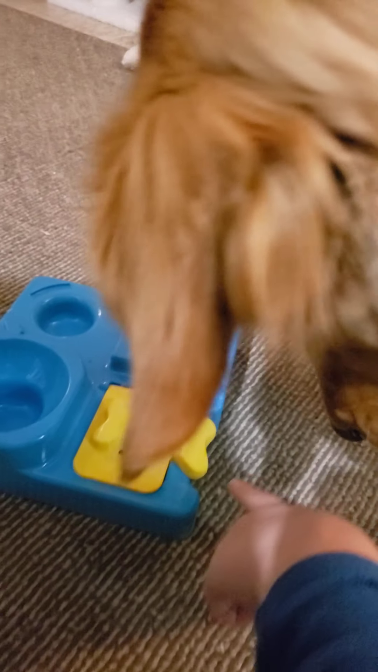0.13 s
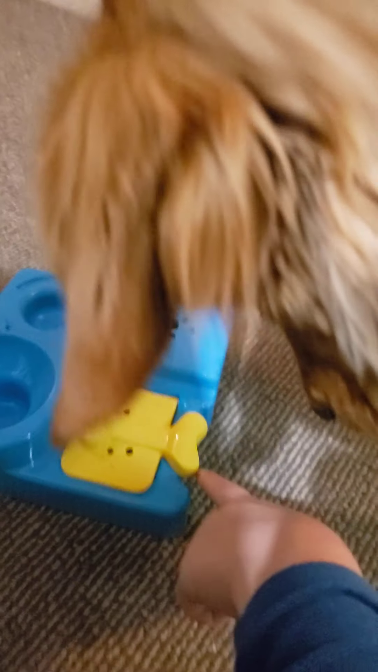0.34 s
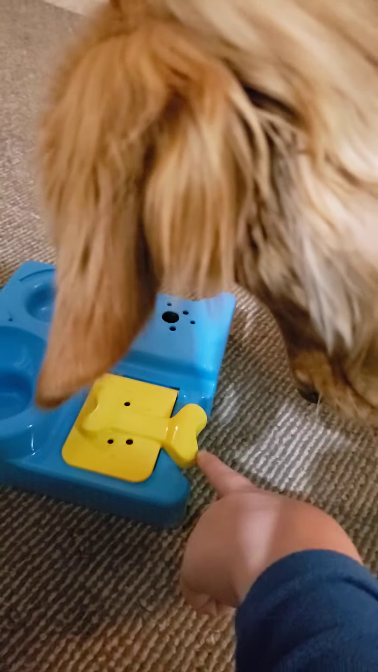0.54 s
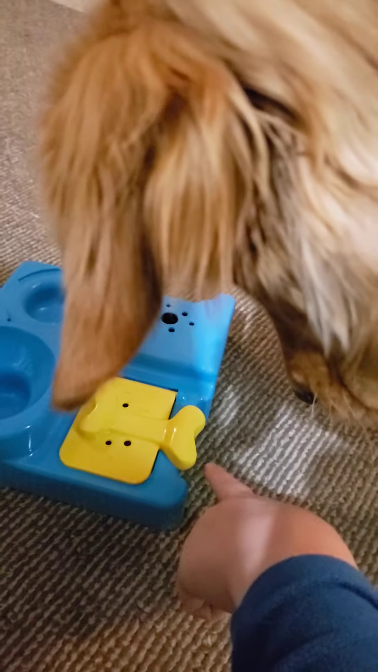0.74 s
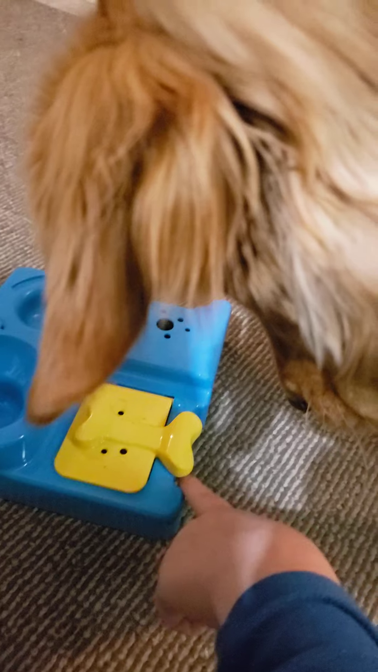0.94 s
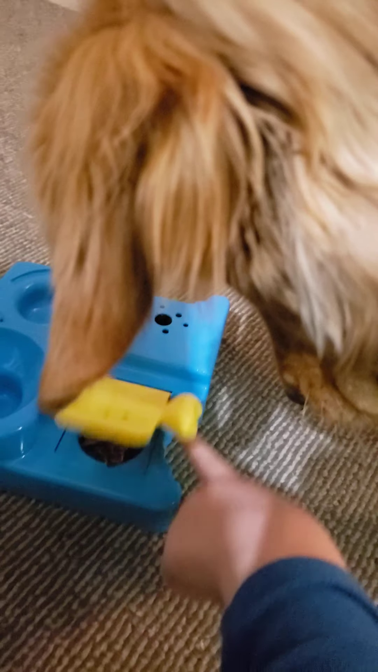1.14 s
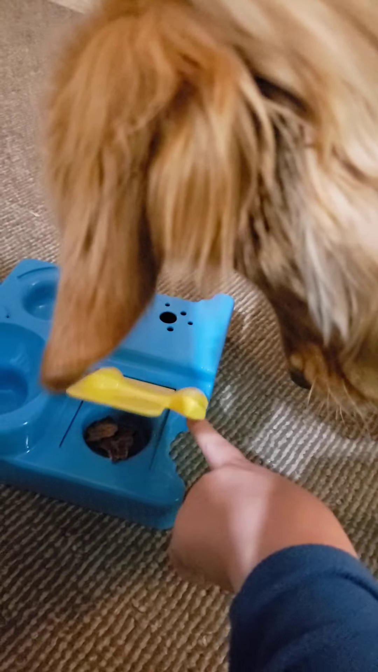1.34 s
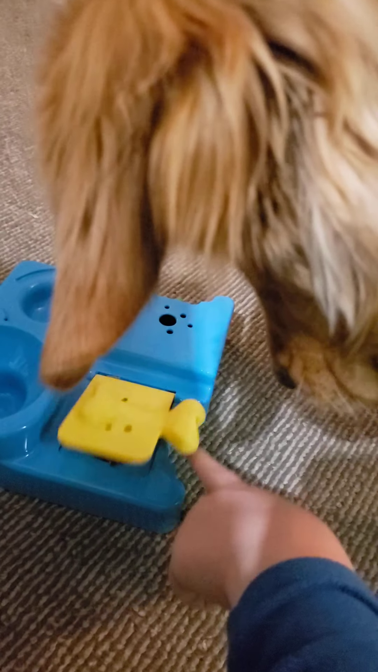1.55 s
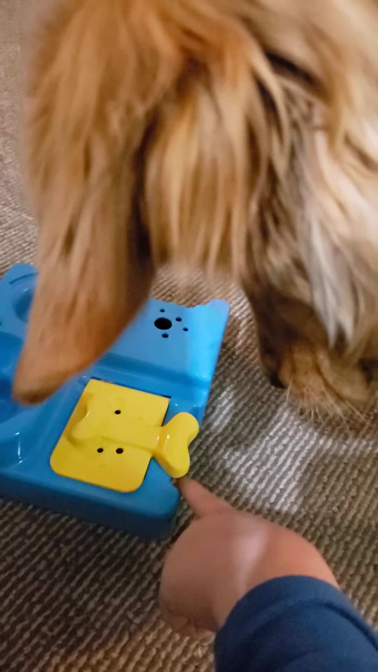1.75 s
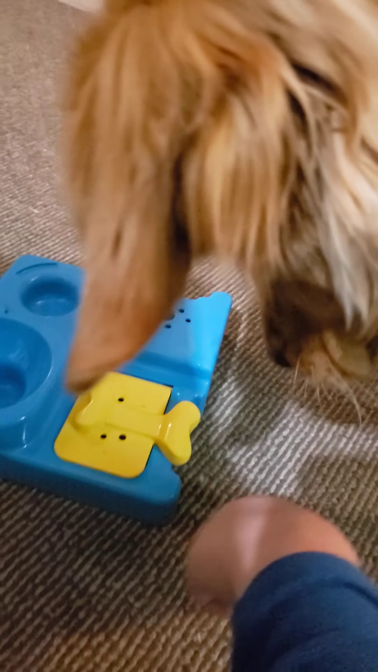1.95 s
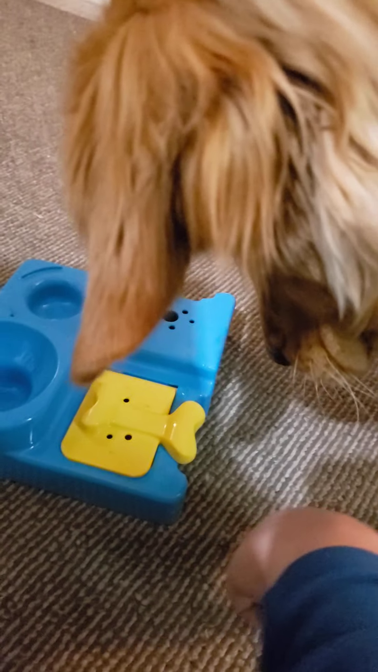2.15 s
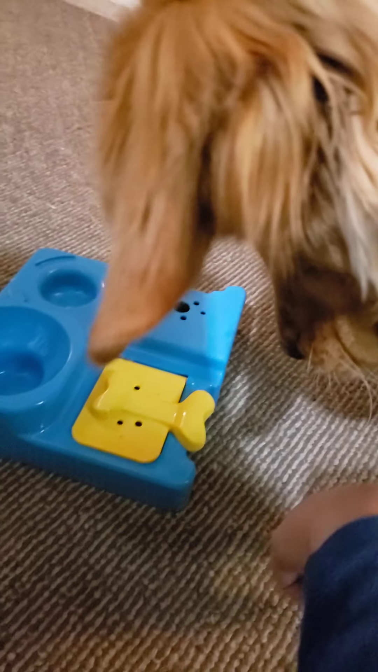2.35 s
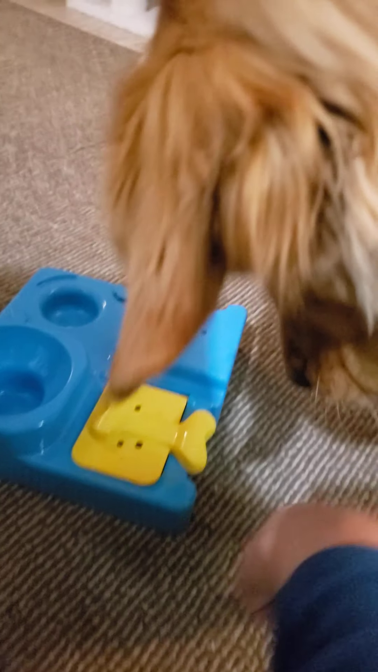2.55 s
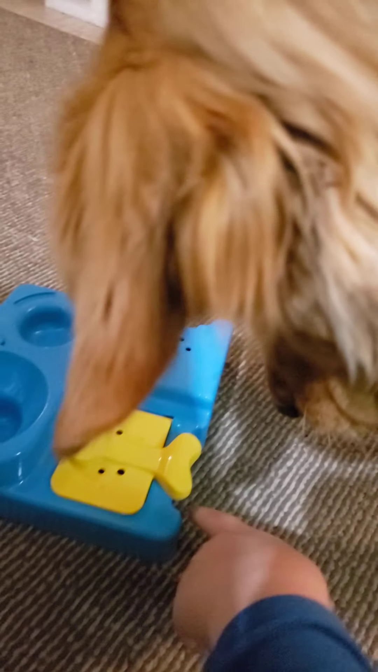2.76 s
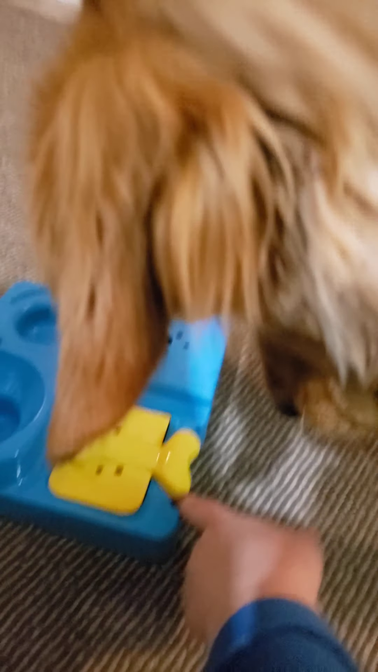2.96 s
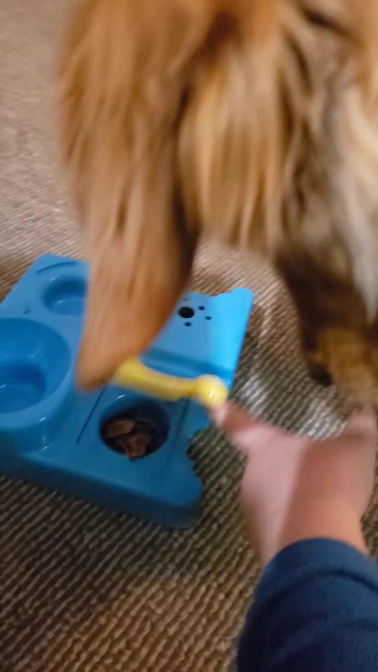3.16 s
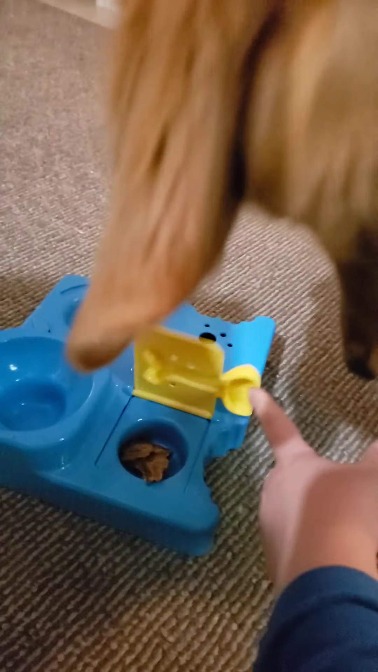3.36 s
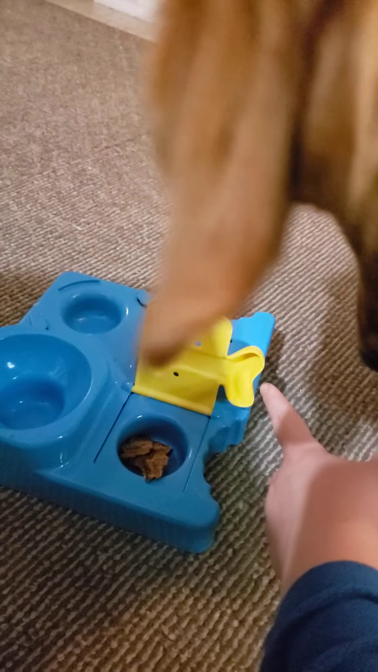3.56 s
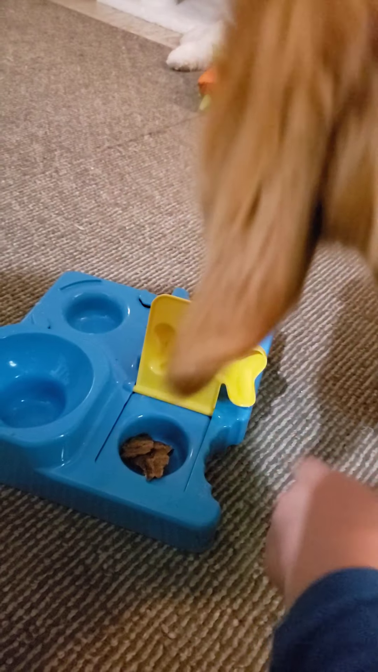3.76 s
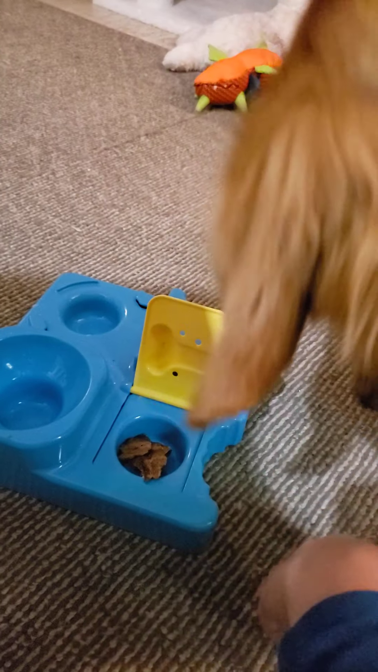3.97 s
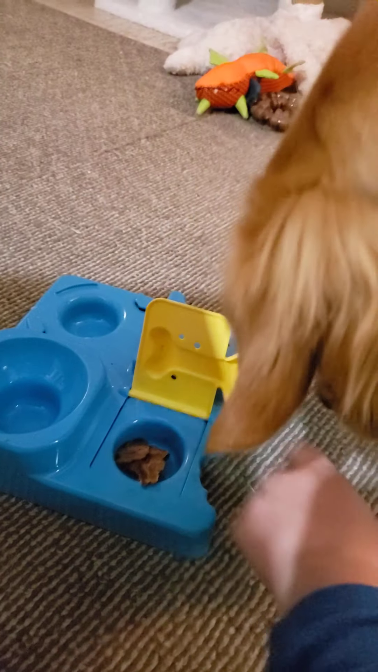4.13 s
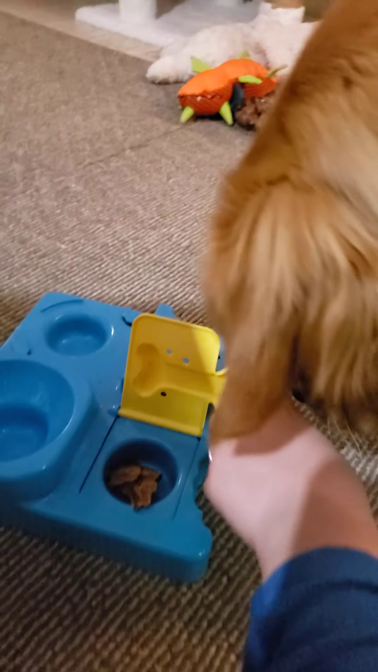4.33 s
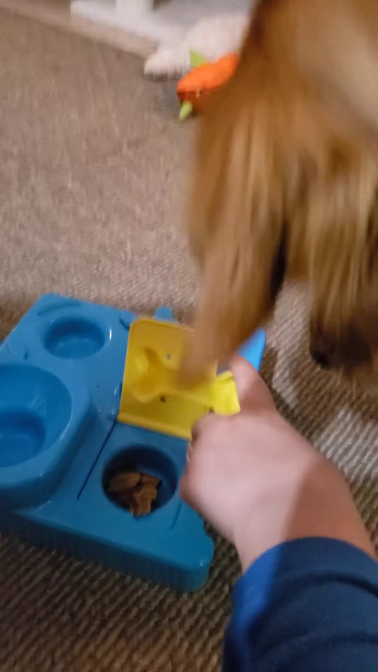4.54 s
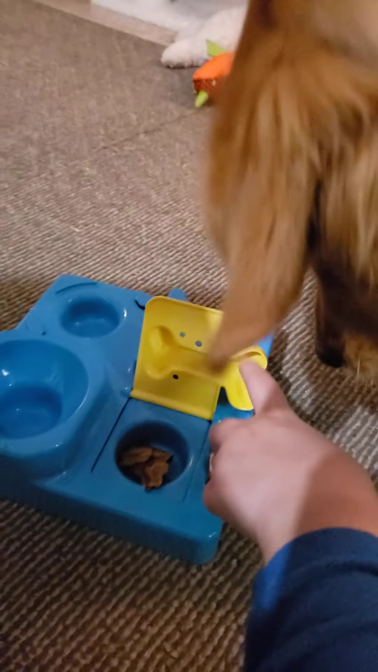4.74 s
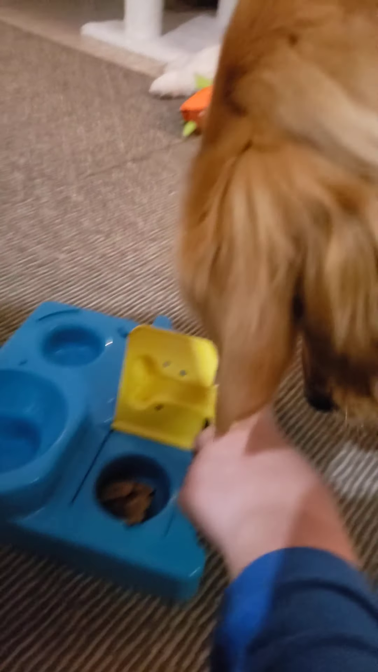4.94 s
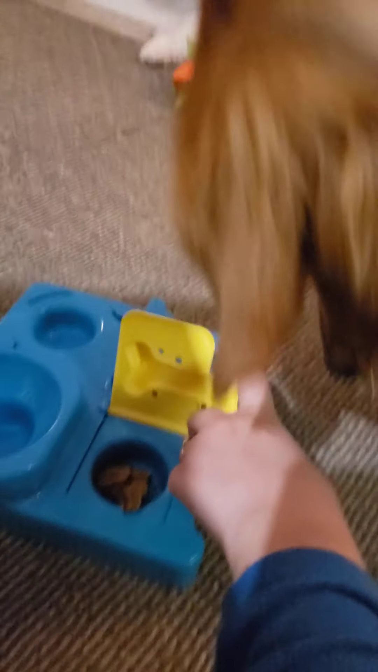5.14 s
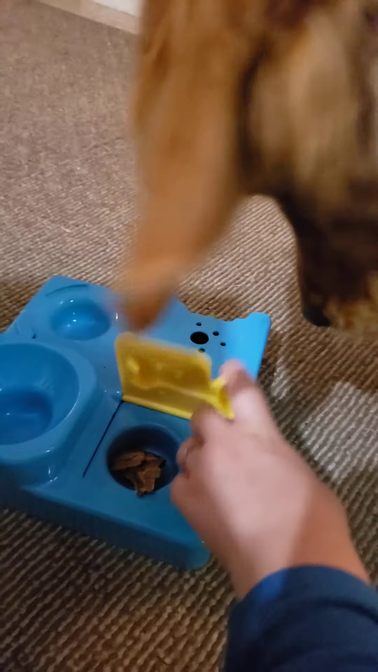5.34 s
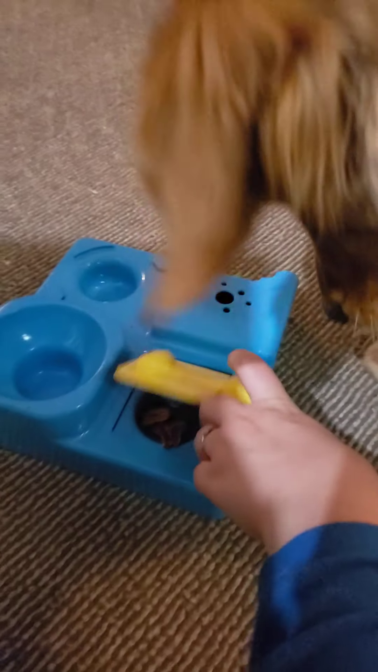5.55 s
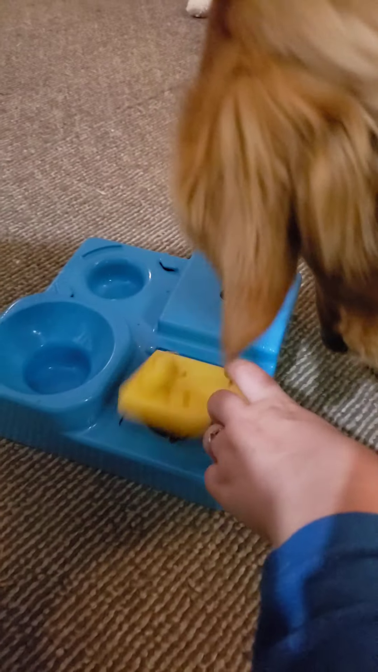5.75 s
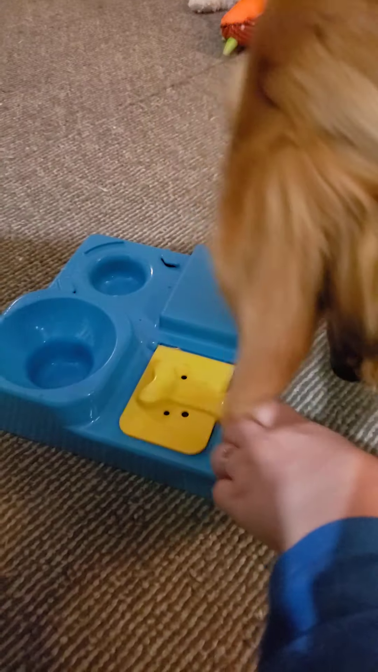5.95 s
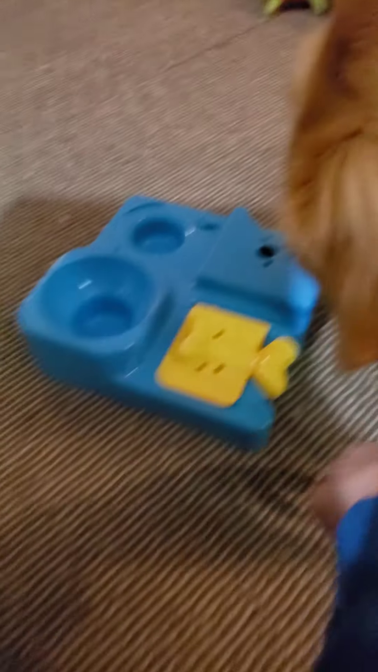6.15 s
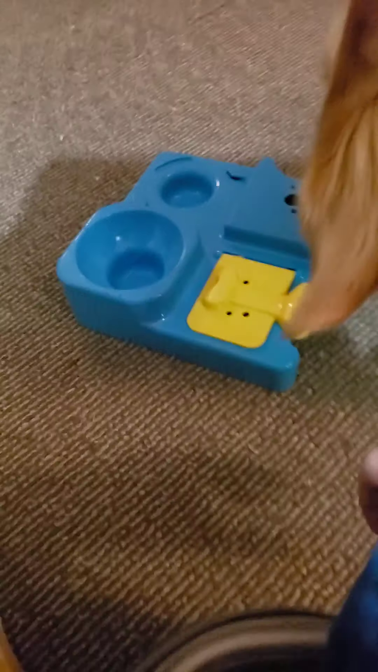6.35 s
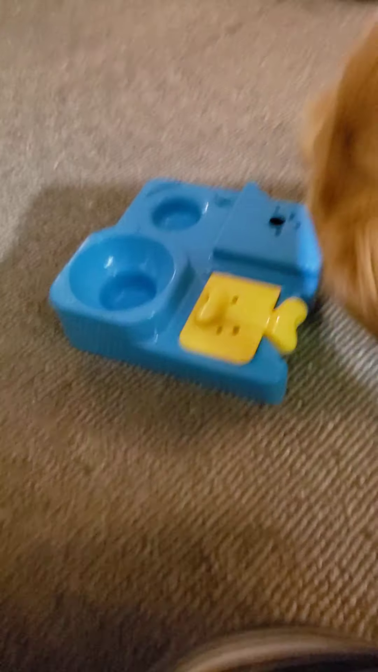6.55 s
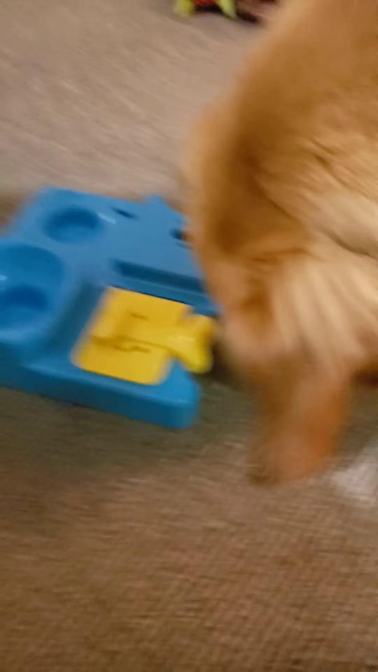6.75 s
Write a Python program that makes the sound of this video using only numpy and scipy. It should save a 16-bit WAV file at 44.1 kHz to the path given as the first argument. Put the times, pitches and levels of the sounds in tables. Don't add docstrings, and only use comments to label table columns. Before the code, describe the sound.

Light plastic ticks, a lid slap, a rattling cluster and one hard clack, with fabric hiss brushing near the microphone and a low appliance hum.

```python
import sys
import numpy as np
from scipy import signal
from scipy.fft import rfft, irfft
from scipy.io import wavfile
from scipy.ndimage import uniform_filter1d

SR = 44100
rng = np.random.default_rng(int(sys.argv[2]) if len(sys.argv) > 2 else 0)


def unload_audio(sound):
    columns = np.transpose(np.atleast_2d(sound))
    steps = np.round(np.clip(columns, -1, 1) * 32767)
    wavfile.write(sys.argv[1], SR, steps.astype(np.int16))


def gain_from_db(level_db):
    decades = np.asarray(level_db, float) / 20
    return 10 ** decades


N = 304290
SIDES = np.array([[.5], [-.5]])
HIT_LENGTH = 4000


def evened(x):
    return x / np.sqrt(np.mean(x ** 2) + 1e-20)


def read(points, hz, column=1):
    table = np.transpose(points)
    return np.interp(np.log(hz + 1), np.log(table[0] + 1), table[column])


def noise(db, same, left_db, lag_s, size, length):
    hz = np.fft.rfftfreq(size, 1 / SR)[:, None]
    t = np.arange(4 * length // size + 5) * size / 4 / SR
    a, b, c, d = rng.standard_normal((4, len(hz), len(t)))
    right = a + 1j * b
    like = np.clip(read(same, hz), 0, 1)
    late = right * np.exp(-2j * np.pi * hz * lag_s)
    left = like * late + np.sqrt(1 - like ** 2) * (c + 1j * d)
    spectra = np.array([left * gain_from_db(read(left_db, hz)), right]) * gain_from_db(db(hz, t))
    return signal.istft(spectra, nperseg=size, noverlap=3 * size // 4)[1][:, :length]


def patches(shape, bins, frames):
    field = rng.standard_normal(shape)
    return evened(uniform_filter1d(uniform_filter1d(field, bins, axis=0), frames, axis=1))


def fridge():
    # multiple of the turning rate, level in dB, left-right difference in dB.
    shaft = [(1, -66, 1), (2, -76, -1), (3, -79, -4), (5, -84, 1), (7, -88, -2), (8, -90, -9), (9, -75, -5),
             (10, -89, -2), (35, -104, -2), (37, -99, -3), (38, -93, -3), (39, -99, -3), (60, -109, 0),
             (66, -98, 0)]
    mains = [(2, -67, -2), (4, -84, -9), (5, -84, -1), (6, -81, -6), (8, -76, -9), (10, -90, -9),
             (11, -88, -14), (12, -88, -4)]
    fan = [(1, -81, 0), (2, -78, 0)]
    # time in seconds, level in dB.
    whine = [(0.0, -85), (0.55, -92.5), (2.7, -87.5), (2.95, -75), (3.67, -81.5), (4.0, -90.5),
             (4.42, -76.5), (5.46, -76.5), (6.9, -83.5)]
    whine_from, whine_lift_db = 33, 89
    hum_db = -0.5
    t = np.arange(N) / SR
    slow = t[::256]
    out = np.zeros((2, N))
    for hz, lines, waver in ((58.85, shaft, .02), (59.97, mains, .01), (53.4, fan, .25)):
        rates = np.geomspace(.2, 2, 8)
        drift = waver * sum(np.sin(2 * np.pi * (f * slow + rng.random())) / f for f in rates)
        turn = 2 * np.pi * hz * t + np.interp(t, slow, drift)
        for k, db, pan_db in lines:
            sway_db = 2.0 * np.sin(2 * np.pi * (rng.uniform(0.14, .9) * slow + rng.random()))
            if whine_from <= k < 2 * whine_from:
                sway_db += np.interp(slow, *np.transpose(whine)) + whine_lift_db
            level = np.interp(t, slow, gain_from_db(hum_db + db + sway_db))
            wave = level * np.sin(k * turn + 2 * np.pi * rng.random())
            out += np.sqrt(2) * gain_from_db(SIDES * pan_db) * wave
    return out


def air():
    # frequency in Hz, level in dB per Hz.
    murmur = [(25, -15), (50, 6), (130, 2.5), (220, -7.5), (500, -6.5), (800, -21), (1600, -25.5),
              (2250, -20.5), (3000, -26.5), (6000, -30.5), (9000, -37), (12500, -27.5), (15500, -26.5)]
    # frequency in Hz, left-right likeness from 0 to 1.
    likeness = [(100, 0.79), (400, 0.43), (800, 0.14), (1500, 0.091)]
    # frequency in Hz, level in dB.
    left_port = [(60, 5.5), (200, -6.5), (600, -3.5), (900, 1.5), (10000, 0.8)]

    def field(hz, t):
        return read(murmur, hz) + 2.0 * patches((len(hz), len(t)), 12, 5)
    return gain_from_db(-66) * evened(noise(field, likeness, left_port, 0, size=2048, length=N))


def ring(modes, spread_db, detune, lean_db, drive):
    hz, db, t60, pan_db, lead = np.transpose(modes)
    t = np.arange(HIT_LENGTH) / SR
    hz = hz * (1 + detune[:len(modes)])
    spectrum = rfft(drive)
    drive = irfft(spectrum / np.sqrt(uniform_filter1d(abs(spectrum) ** 2, size=7))) * (t < .045)
    db = db + spread_db[:len(modes)] + lean_db * np.log2(hz / 520)
    longest = .11 * np.minimum(1, 500 / hz) ** 1.15
    pole = 2j * np.pi * hz - np.log(1000) / np.minimum(t60, longest)
    rise = np.minimum(np.outer(hz, t) / 2, 1)
    waves = np.exp(np.outer(pole, t)) * rise ** 2 * (3 - 2 * rise)
    body = ((gain_from_db(db + SIDES * pan_db) * np.exp(1j * SIDES * lead)) @ waves).imag
    return signal.fftconvolve(body, drive[None])[:, :HIT_LENGTH]


def knock(levels_db, chatter_s, lean_db, tilt_db, plates):
    # frequency in Hz, level in dB,
    # time to fall 60 dB in seconds, left-right difference in dB, lead of the left port in radians.
    walls = [(190, -22, .06, -1, .2), (270, -18, .06, -2, .1), (372, -8, .07, .1, -.1),
             (432, -2.5, .06, .1, -.1), (499, -1.5, .07, .1, .01), (560, -2.5, .06, .1, .12),
             (635, -5, .06, .5, .01), (718, -6.5, .05, -3, -.3), (855, -12, .04, -3, 1.8)]
    stiff_ribs = [(3362, 0.5, 0.022, -9, 1.56), (4305, 6, 0.016, 5.5, -2.5), (4986, 1.5, .015, -3.5, -13),
                  (5030, -6.5, .012, -1.5, -3.5), (5920, -4.5, .012, -7.5, 5.5),
                  (7560, -13.5, 0.013, -3.5, -3)]
    # frequency in Hz, left level in dB, right level in dB.
    crack_colour = [(1920, -22, -17), (3420, -15.5, 0.5), (5000, -4.5, -1.5), (7360, -3, -22),
                    (9820, -19, -14), (11900, -6.5, -15.5), (15400, -14, -16.5)]
    spread_db = 2.2 * rng.standard_normal((3, 12))
    detune = .016 * rng.standard_normal((3, 12))
    t, hz = np.arange(HIT_LENGTH) / SR, np.fft.rfftfreq(HIT_LENGTH, 1 / SR)
    u = t / chatter_s
    force = rng.standard_normal(HIT_LENGTH) * gain_from_db(4.87 * rng.standard_normal(HIT_LENGTH))

    colour_db = np.array([read(crack_colour, hz), read(crack_colour, hz, column=2)])
    colour_db += tilt_db * np.log2(np.maximum(hz / 6000, 1))
    puff = evened(irfft(rfft(rng.standard_normal((2, HIT_LENGTH))) * gain_from_db(colour_db)))
    crack = puff * np.sin(np.pi / 2 * np.minimum(t / 0.00096, 1)) ** 2 * np.exp(-.9 * u)

    shell = ring(walls, spread_db[0], detune[0], lean_db, force * u * np.exp(-1.2 * u))
    panel = ring(plates, spread_db[1], detune[1], 0, force * u ** 0.95 * np.exp(-1.1 * u))
    ribs = ring(stiff_ribs, spread_db[2], detune[2], 0, force * np.exp(-1.1 * u))
    parts = shell, panel, crack + gain_from_db(2.5) * ribs / abs(ribs).max()
    return sum(gain_from_db(db) * part / abs(part).max() for db, part in zip(levels_db, parts))


def feeder():
    # frequency in Hz,
    # level in dB, time to fall 60 dB in seconds, left-right difference in dB, lead of the left port in radians.
    panels = [(1193, -11, 0.043, 4, 0.5), (1282, -7, 0.071, 3, 1.4), (1630, -18, 0.034, 0.5, 0),
              (1910, -9.5, .04, -2, -0.9), (1895, .5, .04, -3.5, -1.62), (2060, -8, .03, -3.5, 0.5),
              (2288, -3, .035, -8.5, 0.86), (2410, -7, .03, -6, -0.9), (2646, -3.5, .03, 0.5, 2.5),
              (2998, -5.5, .025, 0, 0.7)]
    flap = [(855, -9, 0.048, 4, 2.7), (1154, -8, 0.04, 4, -0.3), (1299, -4.5, .045, 5, 1.15),
            (1580, -11.5, .03, 6, -3), (1890, -10, .04, -2, -3.9), (2060, -5.5, .03, -3.5, 2.3),
            (2180, -6.5, .03, -7.5, .5), (2236, -1.5, .035, -7.5, 1.4), (2340, -6.5, .03, -3.5, -0.5),
            (2640, 0.5, .03, -2.7, 2), (3100, -8, .025, 3.9, 3.3)]
    # start in seconds, shell level in dB,
    # panel level in dB, crack level in dB, lean of the shell toward its upper modes in dB an octave.
    lid_slaps = [
        (0.93, -38, -41, -46, -7),
        (1.793, -33, -26, -25, -6),
        (1.811, -29, -22.5, -31.5, 7.5),
        (5.367, -53, -54.5, -44, -14),
        (5.871, -13.5, -3, -5.5, -3.5),
        (5.884, -22.5, -24, -18.5, 8.5),
    ]
    knocks = [(0.354, -33, -33.5, -42, 1.5), (1.071, -26.5, -30.5, -42.5, 3.5),
              (1.161, -36.5, -33.5, -35, -4), (2.968, -33.5, -37.5, -47.5, 5), (3.048, -42.5, -36, -51, 0),
              (3.081, -36.5, -42, -53, -3), (3.238, -40.5, -35.5, -38.5, -3.5),
              (3.408, -42, -33.5, -29.5, 12), (3.568, -22.5, -12.5, -16.5, -3.5),
              (3.68, -24, -14, -25.5, 3.5), (3.737, -33.5, -23.5, -33.5, 9.5),
              (4.675, -35, -24.5, -36.5, -2.5), (5.466, -37.5, -48.5, -55, 1),
              (5.478, -30.5, -35.5, -50, 1), (5.535, -20.5, -23, -24.5, 3.9), (5.562, -27, -32.5, -48, 0.5),
              (5.665, -43, -37, -48, -10)]
    # start in seconds, shell level in dB, panel level in dB.
    rebounds = [
        (0.953, -38, -34.5),
        (1.179, -37, -42.5),
        (1.83, -37.5, -37.5),
        (3.25, -54, -43),
        (3.579, -35, -20.5),
        (3.591, -28, -46),
        (3.685, -26.5, -15),
        (3.76, -47, -40.5),
        (5.546, -30, -20.5),
        (5.59, -49, -38.5),
    ]
    touches = [(0.09, -72, -67), (0.121, -67, -63), (0.484, -50, -67), (0.51, -55.5, -77),
               (1.058, -54, -54.5), (1.24, -49, -70), (1.269, -50.5, -55.5), (1.579, -56, -52),
               (1.61, -55.5, -60), (3.549, -57, -60), (4.723, -55.5, -45), (4.809, -64, -60),
               (5.272, -55, -64), (5.348, -50.5, -57), (5.43, -53, -59), (5.512, -42, -49),
               (5.62, -53, -59.5), (5.7, -54, -64), (5.75, -50.5, -64.5), (5.79, -54, -67),
               (5.827, -43.5, -57.5), (5.857, -36.5, -44)]
    hard_s, soft_s = .0028, .0023
    slap_tilt_db, knock_tilt_db = -1.8, -16
    hits = []
    for s, shell, panel, crack, lean in lid_slaps:
        hits.append((s, (shell, panel, crack), hard_s, lean, slap_tilt_db, flap))
    for s, shell, panel, crack, lean in knocks:
        hits.append((s, (shell, panel, crack), hard_s, lean, knock_tilt_db, panels))
    for s, shell, panel in rebounds:
        hits.append((s, (shell, panel, panel - 13.5), hard_s, 8.5, knock_tilt_db, panels))
    for s, shell, panel in touches:
        hits.append((s, (shell, panel, panel - 3.5), soft_s, -2.6, knock_tilt_db, panels))

    groups = np.zeros((3, 2, N + HIT_LENGTH))
    for k, (s, *settings) in enumerate(hits):
        start = round(s * SR)
        groups[k % 3, :, start:start + HIT_LENGTH] += knock(*settings)
    return signal.sosfilt(signal.butter(2, 230, "high", fs=SR, output="sos"), groups[..., :N])


def room(x):
    # frequency in Hz, time to fall 60 dB in seconds, echoes against the direct sound in dB.
    decay = [(250.7, 0.22, -4), (500, 0.16, -9), (800, 0.22, -7), (1200, .2, -3.5), (2000, 0.16, -7.5),
             (4000, 0.18, -3.5), (8000, 0.17, -5.5), (13000, 0.1252, -0.5)]
    # frequency in Hz, left-right likeness from 0 to 1.
    likeness = [(300, .98), (700, .92), (1000, .35), (2300, .9), (4000, .3)]
    length = 15000
    level = [(1, 0), (2, 0)]
    tail = noise(lambda hz, t: -60 * t / read(decay, hz), likeness, level, 0, size=256, length=length)
    tail = tail * np.clip((np.arange(length) / SR - .003) / 0.0017, 0, 1)
    colour = gain_from_db(read(decay, np.fft.rfftfreq(length, 1 / SR), column=2))
    echoes = irfft(rfft(tail) * colour) / np.linalg.norm(tail[0])
    return signal.fftconvolve(x, echoes, axes=1)[:, :N]


def sleeve():
    # time of the fastest rub in seconds, level in dB, rise in seconds, fall in seconds, brightness in dB.
    strokes = [(0.2, -69, 0.15, 0.21, -3), (1.6, -91, 0.022, 0.076, -15), (2.05, -87, 0.037, 0.18, -8),
               (2.22, -88.5, .04, 0.23, -6), (2.37, -92, .06, 0.087, -2), (2.735, -67.5, 0.076, 0.34, -5),
               (4.331, -59.5, 0.15, 0.21, -1.8), (4.99, -59.5, 0.064, .12, -1.5),
               (5.4, -72.5, .2, 0.25, -7), (6.1, -74.5, .13, 0.12, -7.5), (6.22, -69.5, 0.12, .15, 3),
               (6.396, -57.5, .16, 0.19, 4.5), (6.57, -64, .15, 0.17, 6.5), (6.84, -63, 0.19, 0.44, 5.5)]
    # frequency in Hz, level in dB.
    cloth = [(700, -4.5), (1500, -3), (2600, -1), (4500, 0.55), (7000, -5), (9600, -12.5), (12200, -8),
             (15500, -9)]
    left_port = [(150, -15.5), (1200, -22), (2200, -11), (3600, -19), (6000, -6), (9000, -14.5),
                 (14000, -42)]
    # frequency in Hz, left-right likeness from 0 to 1.
    likeness = [(300, 0.53), (1500, 0.53), (3000, 0.24), (5000, 0.03)]
    ends_db, flutter_db = -17, 7
    thinning = 0.8
    s, db, rise, fall, bright_db = np.transpose(strokes)[:, :, None]

    def field(hz, t):
        away = (t - s) / np.where(t < s, rise, fall)
        rub = gain_from_db(2 * (db + ends_db * away ** 2)) + 1e-14
        bright = (rub * bright_db).sum(0) / rub.sum(0)
        top = np.clip((hz - 7000) / 3000, 0, 1)
        low = 1 / (1 + (hz / 350) ** 4)
        power = gain_from_db(2 * (read(cloth, hz) + top * bright)) + low * gain_from_db(2 * flutter_db)
        power *= gain_from_db(-2 * thinning * np.maximum(bright, 0) / (1 + (hz / 3300) ** 4))
        shape = (len(hz), len(t))
        grain_db = 0.5 * patches(shape, 5, 9) + 0.79 * patches(shape, 90, 2)
        return 10 * np.log10(rub.sum(0) * power) + grain_db
    return gain_from_db(-6.5) * noise(field, likeness, left_port, lag_s=0.00033, size=512, length=N)


def thump():
    # start in seconds, level in dB, frequency in Hz, length in seconds.
    push = (5.534, -34, 150, .035)
    s, db, hz, length = push
    u = np.maximum(np.arange(N) / SR - s, 0)
    return gain_from_db(db) * np.sin(2 * np.pi * hz * u) * u / length * np.exp(1 - 3 * u / length)


def scene():
    hits = feeder()
    echoes = sum(room(group) for group in hits)
    return fridge() + air() + hits.sum(0) + echoes + sleeve() + thump()


def low_pass(x):
    return signal.sosfilt(signal.butter(12, 16660, fs=SR, output="sos"), x)


def record(dry):
    cut = signal.sosfilt(signal.butter(4, 42, "high", fs=SR, output="sos"), dry)
    band_limit = signal.firwin(255, 16300, window=("kaiser", 9), fs=SR)
    limited = signal.oaconvolve(cut, band_limit[None], "same")
    return low_pass(limited)


dry = scene()
out = record(dry)
unload_audio(out)
```